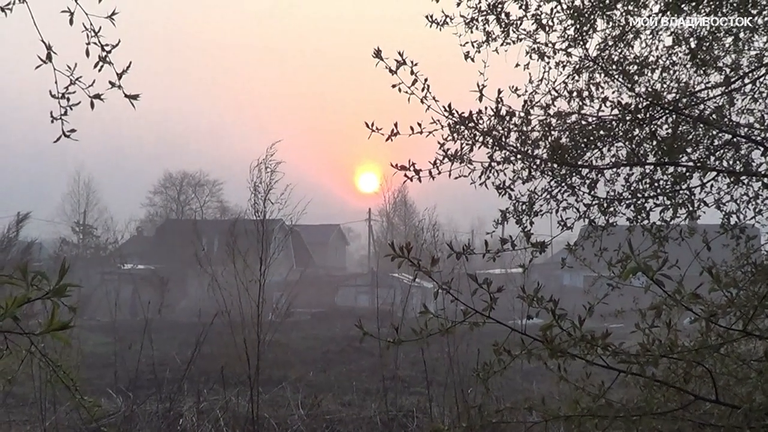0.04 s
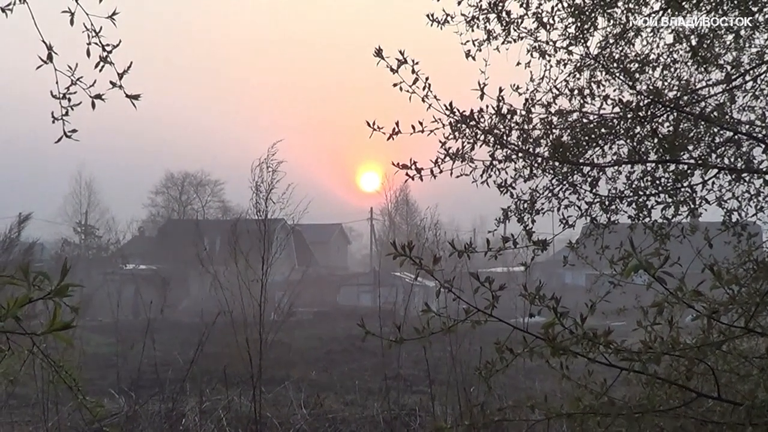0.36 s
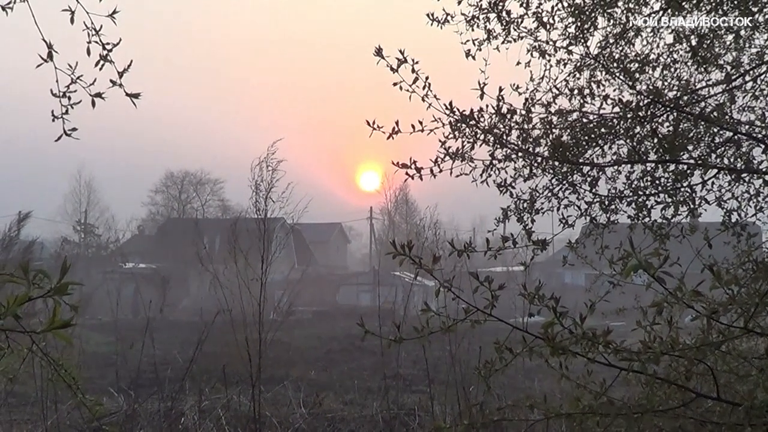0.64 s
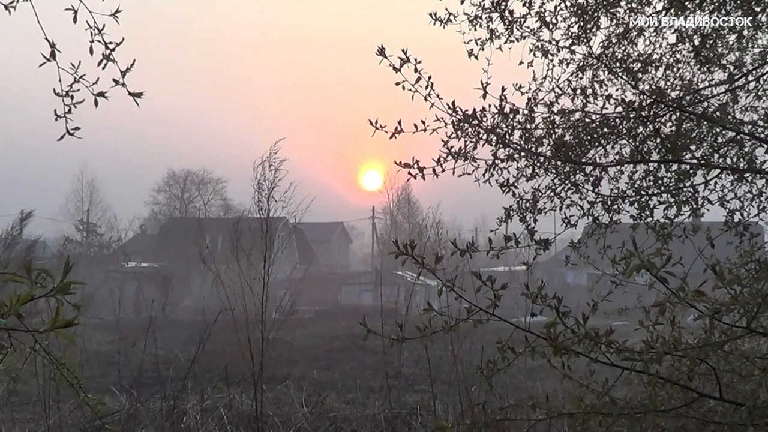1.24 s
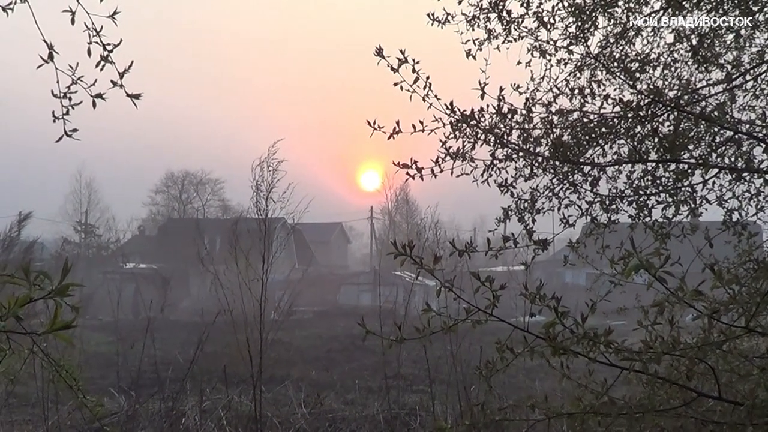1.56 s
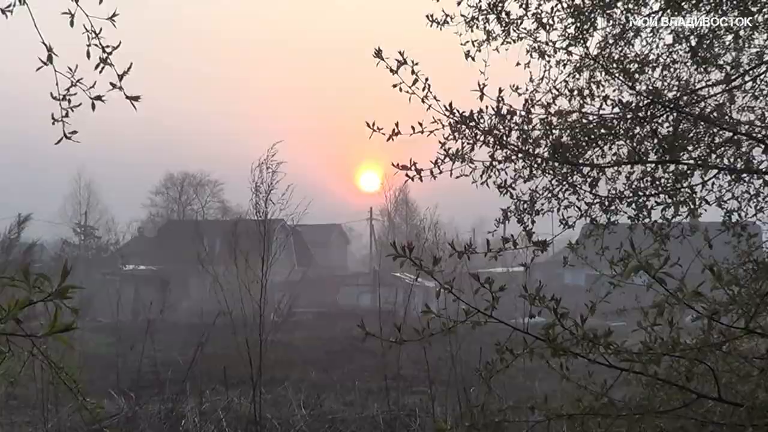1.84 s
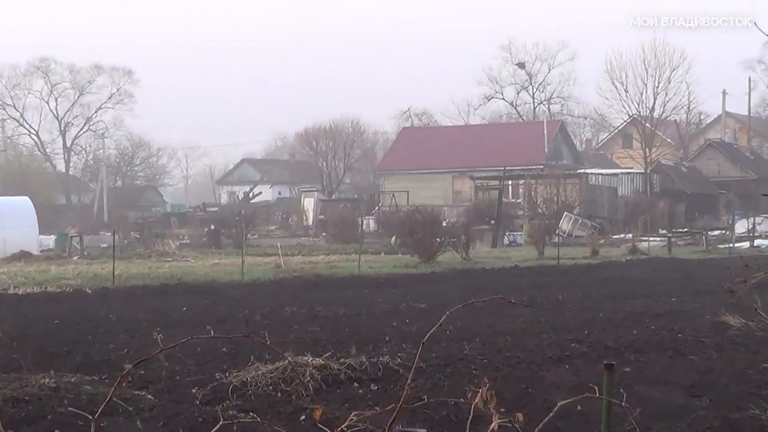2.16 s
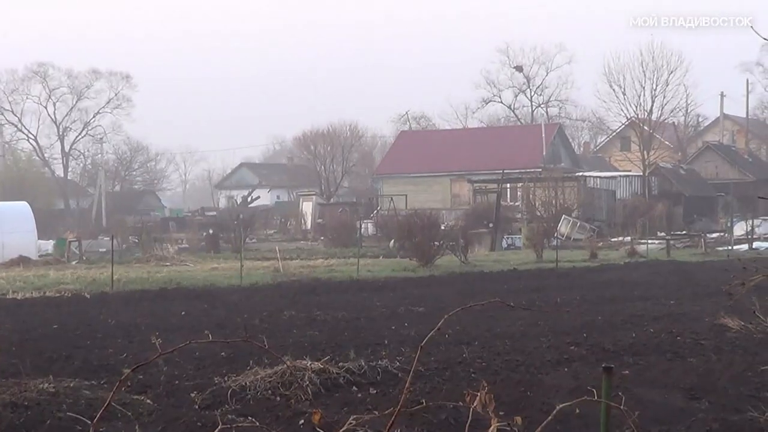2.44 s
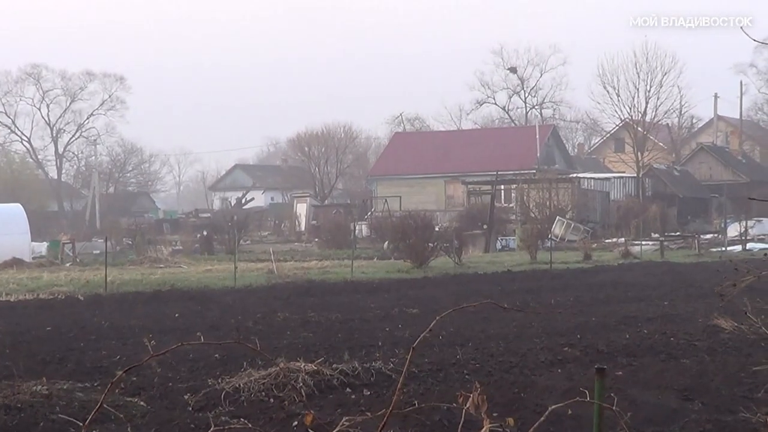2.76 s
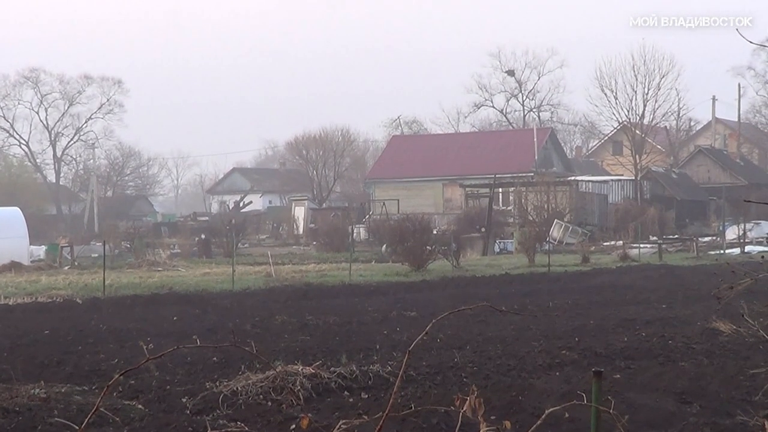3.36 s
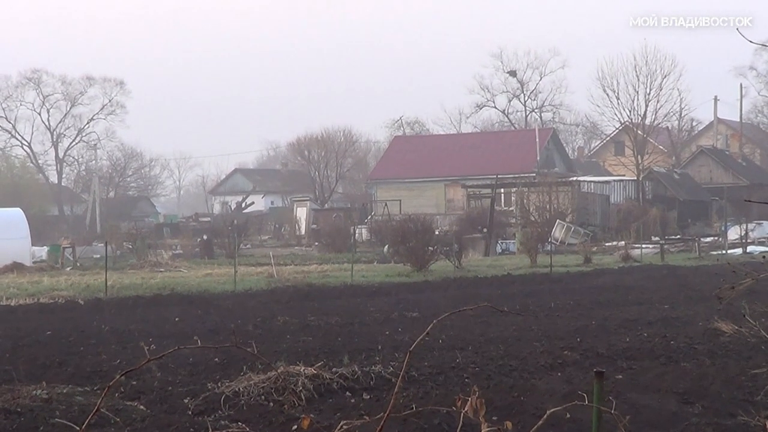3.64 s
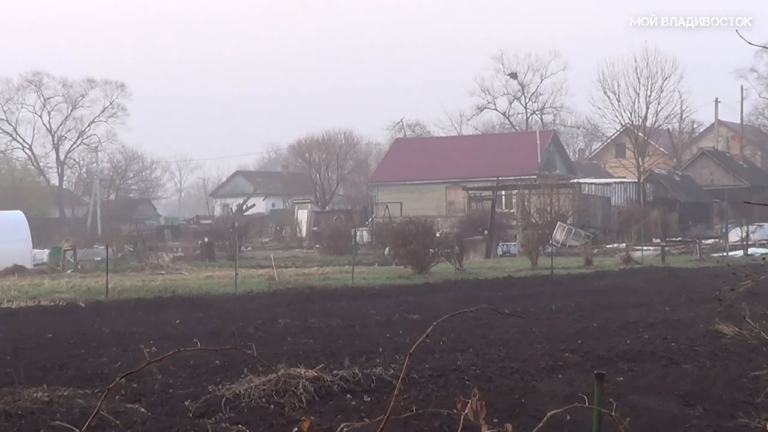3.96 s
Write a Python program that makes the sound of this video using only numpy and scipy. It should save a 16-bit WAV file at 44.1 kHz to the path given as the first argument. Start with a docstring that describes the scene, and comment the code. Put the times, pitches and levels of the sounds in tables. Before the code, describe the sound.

Sparrows chirp close to the microphone and farther out while a songbird whistles thinly and a dove coos faintly. The steady outdoor hiss cuts out for an instant halfway, then a distant rooster crows hoarsely across the village yards.

```python
"""A rooster crows far off to the right, hoarse at first and then on a held note, in a misty village morning.
Sparrows chirp near the microphone and farther out, a songbird whistles, a thrush chucks twice, a dove coos.
Each voice is a gliding tone or a stack of harmonics; houses and trees throw everything back.
A few twigs tick over the still air and the camera's hiss, and the sound drops out briefly halfway."""
import sys
import numpy as np
from scipy import signal
from scipy.fft import rfft, irfft
from scipy.io import wavfile
from scipy.ndimage import uniform_filter1d

SR = 44100
rng = np.random.default_rng(int(sys.argv[2]) if len(sys.argv) > 2 else 0)


def digitize_waveform(pressure):
    """Quantize a signal to 16-bit integers and store it at the path in sys.argv[1].

    Rows of a 2-D input are taken as channels; values are limited to [-1, 1].
    """
    field = np.atleast_2d(pressure).T
    bounded = np.clip(field, -1, 1)
    quanta = np.round(bounded * 32767).astype(np.int16)
    wavfile.write(sys.argv[1], SR, quanta)


N = 176400
TIME = np.arange(N) / SR
ROOSTER_PAN_DB = -7.5  # left minus right, like every pan
CHIRP_EDGE_S, WHISTLE_EDGE_S, WHISTLE_ECHO_DB = 0.0032, 0.011, -12.5
DROP_FROM_S, DROP_TO_S = 1.941, 1.9735
# still air and hiss at the microphone (frequency [Hz], relative level [dB])
AIR_SPECTRUM = [(18, -48), (30, -29), (64, -8.5), (132, -9), (216, -3), (437, 1.5), (1410, -5), (1520, -3),
                (1780, -4), (3320, -2.5), (4650, -5), (5440, -6), (8040, -13), (12200, -16.5), (13500, -15),
                (15000, -18)]


def amp(db):
    """Decibels to gain."""
    return 10 ** (np.asarray(db) / 20)


def unit(x):
    """Scales to rms 1."""
    return x / np.sqrt(np.mean(x ** 2) + 1e-20)


def read(points, hz):
    """Reads a curve on a log-frequency axis."""
    f, value = np.transpose(points)
    return np.interp(np.log(hz + 1), np.log(f + 1), value)


def add(mix, s, sound, pan_db=0):
    """Places a sound at a time and a left-right balance."""
    at = round(s * SR)
    sound = sound[max(-at, 0):]
    part = mix[:, max(at, 0):][:, :len(sound)]
    part += amp([[pan_db / 2], [-pan_db / 2]]) * sound[:part.shape[1]]


def wander(t, rate_hz):
    """Smooth random motion of rms 1."""
    count = len(t) + SR // 10
    hz = np.fft.rfftfreq(count, 1 / SR)
    return unit(irfft(rfft(rng.standard_normal(count)) * np.exp(-(hz / rate_hz) ** 2)))[:len(t)]


def voice(hz, count=1):
    """Equal harmonics in random phase on a pitch curve."""
    phase = 2 * np.pi * np.cumsum(hz) / SR
    return np.sqrt(2) * sum(np.sin(k * phase + 2 * np.pi * rng.random()) for k in range(1, count + 1))


def throat(x, colour):
    """Colours a sound with a fixed spectrum; rms 1."""
    hz = np.fft.rfftfreq(len(x), 1 / SR)
    return unit(irfft(rfft(x) * amp(read(colour, hz)), len(x)))


def swell(t, edge_s):
    """Soft attack, hold, soft release."""
    return np.sin(np.pi / 2 * np.clip(np.minimum(t, t[-1] - t) / edge_s, 0, 1))


def fading(t):
    """A call's level flickers by about 3 dB on its way to the microphone."""
    return amp(3 * wander(t, 67))


def clear_crow():
    """The rooster's held note: three harmonics, the second the strongest."""
    # clear voice (time [s], pitch [Hz], second harmonic [dB], third harmonic [dB])
    crow = [(3.122, 860, -70, -80), (3.2, 883.5, -53.5, -74), (3.3, 885, -73, -80), (3.475, 890, -65, -69),
            (3.498, 899, -41, -66), (3.535, 905, -43.5, -66), (3.566, 887, -54, -59),
            (3.645, 874, -67, -71), (3.685, 870, -43, -71), (3.728, 866.3, -42.5, -72),
            (3.755, 865, -46.5, -55), (3.794, 864, -48.5, -58), (3.83, 864.6, -40.5, -57),
            (3.856, 870, -53, -57), (3.878, 857.7, -45.5, -72), (3.93, 857.5, -48, -55),
            (3.97, 859.6, -50.5, -67), (3.99, 870, -41.5, -63)]
    out = np.zeros((2, N))
    s, hz, second_db, third_db = np.transpose(crow)
    pitch = np.interp(TIME, s, hz) * (1 + 0.0043 * wander(TIME, 124))
    for k, db in enumerate([second_db - 20, second_db, third_db], 1):
        add(out, 0, amp(np.interp(TIME, s, db, left=-120)) * voice(k * pitch), ROOSTER_PAN_DB)
    return out


def hoarse_crow():
    """The rooster's rasp: two fluttering oscillators, one pitched a little under the other."""
    # hoarse voice (time [s], upper pitch [Hz], upper level [dB], lower level [dB])
    rasp = [(3.08, 789, -68, -85), (3.191, 789, -56, -73), (3.24, 784.4, -50.5, -56),
            (3.39, 771.6, -53.5, -57), (3.46, 772.3, -51, -56), (3.56, 773.6, -49, -54.5),
            (3.65, 770.7, -54, -54.5), (3.701, 772, -47.5, -72), (3.78, 807, -63, -60),
            (4.0, 800, -59, -62.5)]
    # throat colour of each oscillator (frequency [Hz], relative gain [dB])
    upper_throat = [(350, -19), (600, -15), (730, -8), (980, -12), (1300, -3.5), (1600, 7), (2050, 0.5),
                    (2450, -13.5), (3100, -10), (5500, -18)]
    lower_throat = [(450, -23), (700, -6), (1000, 3.5), (1380, -6), (2090, -5), (2600, -22), (4000, -28)]
    flutter_hz, lower_ratio = 190.4, .905
    out = np.zeros((2, N))
    s, hz, upper_db, lower_db = np.transpose(rasp)
    pitch = np.interp(TIME, s, hz)
    upper = voice(pitch * (1 + 0.02285 * wander(TIME, 189.5)), count=6)
    flutter = voice(flutter_hz * (1 + 0.203 * wander(TIME, 81.4)))
    upper *= 1 + 0.95 * flutter + .5 * wander(TIME, 220)
    lower = voice(pitch * lower_ratio * (1 + .035 * wander(TIME, 105.8)), count=4)
    lower *= 1 + 1.4 * wander(TIME, 145)
    for tone, colour, db in (upper, upper_throat, upper_db), (lower, lower_throat, lower_db):
        add(out, 0, amp(np.interp(TIME, s, db, left=-120)) * throat(tone, colour), ROOSTER_PAN_DB)
    return out


def short_crows():
    """Short crows: the rooster's brief first note and other roosters farther off, each a wavering tone and its
    octave."""
    # short calls (time [s], length [s], pitch [Hz], fundamental [dB], octave [dB])
    calls = [(1.66, 0.284, 795, -69, -71.5), (2.824, .175, 804, -83, -59.5),
             (2.936, 0.13, 1061, -69.5, -66), (3.39, 0.096, 1052, -69.5, -56), (3.619, .2, 619, -74, -58)]
    out = np.zeros((2, N))
    for s, length, pitch, low_db, octave_db in calls:
        t = np.arange(0, length, 1 / SR)
        hz = pitch * (1 + 0.018 * wander(t, 148))
        envelope = swell(t, edge_s=0.045) * fading(t)
        tone = amp(low_db) * voice(hz) + amp(octave_db) * voice(2 * hz)
        add(out, s, envelope * tone, ROOSTER_PAN_DB)
    return out


def roosters():
    """All the crowing, heard across the yards; the rasp arrives mostly as echo."""
    clear, hoarse, far = clear_crow(), hoarse_crow(), short_crows()
    return yard(clear + far, echo_db=-6) + yard(hoarse, echo_db=1.83, direct_db=-1.5)


def sparrows():
    """Chirps near the microphone: one warbling tone bent through three pitches."""
    # chirps (time [s], length [s], start [Hz], middle [Hz], end [Hz], warble [Hz], level [dB], pan [dB])
    chirps = [(0.004, 0.043, 2543, 2220, 2070, 100, -50.5, 0),
              (0.13, .072, 3600, 3807, 3190, 200, -52, -1.5), (0.156, 0.028, 4520, 4750, 4040, 98, -53, -3),
              (0.441, 0.01, 5460, 5760, 5500, 100, -50.5, 3),
              (0.925, 0.021, 4490, 5130, 4560, 80, -50.5, -1),
              (1.002, 0.021, 4600, 4190, 3500, 100, -57, -5),
              (1.726, 0.046, 7950, 8770, 8730, 78, -64.5, 13),
              (1.761, 0.062, 8390, 8050, 8100, 400, -54.5, 5),
              (1.9, 0.032, 7550, 6440, 4000, 78, -56, 11.5), (2.062, 0.03, 3670, 3340, 3670, 197, -54, -5),
              (2.371, 0.029, 3510, 4520, 3620, 100, -50, -10),
              (2.81, 0.02, 4910, 5180, 4600, 60, -48.5, -7),
              (2.823, .046, 4305, 3530, 3180, 306, -50.5, -8), (3.002, 0.035, 1780, 1842, 2020, 46, -55, 5),
              (3.015, 0.046, 3100, 3660, 3110, 200, -51, -4), (3.219, 0.038, 1895, 3260, 2600, 40, -60, 4),
              (3.286, 0.035, 3426, 3810, 3990, 153, -54, 3), (3.938, .013, 4360, 5280, 6900, 84, -58.5, 13)]
    warble_rate_hz, jitter_hz = 47.5, 143
    out = np.zeros((2, N))
    for s, length, first, middle, last, warble, db, pan in chirps:
        t = np.arange(0, length, 1 / SR)
        bend = np.polyfit([0, .5, 1], [first, middle, last], 2)
        hz = np.polyval(bend, t / length) - warble * np.sin(2 * np.pi * warble_rate_hz * t)
        envelope = amp(db) * swell(t, CHIRP_EDGE_S) * fading(t)
        add(out, s, envelope * voice(hz + jitter_hz * wander(t, 486)), pan)
    return yard(out, echo_db=-5, direct_db=-3)


def chips():
    """Sharp chips to the right: a high tone shaken so fast that it spreads into a bright tick."""
    # chips (time [s], length [s], pitch [Hz], level [dB])
    calls = [(0.89, .016, 6600, -51.5), (.994, .016, 6470, -46), (1.086, .014, 7000, -61),
             (1.124, .012, 6500, -62)]
    spread_hz = 400
    out = np.zeros((2, N))
    for s, length, pitch, db in calls:
        t = np.arange(0, length, 1 / SR)
        hz = pitch + spread_hz * wander(t, 800)
        add(out, s, amp(db) * swell(t, length / 2) * voice(hz), pan_db=-4.5)
    return yard(out, echo_db=-8)


def thrush():
    """Harsh chucks just left of centre: a harmonic stack falls through a fixed throat."""
    # chucks (time [s], length [s], level [dB])
    chucks = [(0.449, .032, -44.5), (0.549, .039, -43.5)]
    # throat colour (frequency [Hz], relative gain [dB])
    colour = [(800, -69), (1450, -8.5), (1950, -12.5), (2450, -1), (3000, -13), (3700, -18), (4600, -10),
              (5300, -20), (8000, -25)]
    from_hz, to_hz = 720, 430
    out = np.zeros((2, N))
    for s, length, db in chucks:
        t = np.arange(0, length, 1 / SR)
        hz = (from_hz + (to_hz - from_hz) * t / length) * (1 + 0.035 * wander(t, 540))
        add(out, s, amp(db) * swell(t, length / 2) * throat(voice(hz, count=12), colour), pan_db=3)
    return yard(out, echo_db=-4)


def songbird():
    """Pure, distant whistles: high notes that droop at the end, and lower slurs that fall and settle."""
    # high notes (time [s], length [s], level [dB])
    whistles = [(0.368, 0.094, -63), (0.587, 0.11, -63), (0.824, 0.13, -60.5), (1.068, 0.11, -61),
                (1.343, 0.103, -60)]
    # slurs (time [s], length [s], start pitch [Hz], settling pitch [Hz], start level [dB])
    slurs = [(.79, .05, 2400, 1960, -65), (.868, .06, 4050, 3170, -62), (0.904, 0.096, 2950, 2480, -67),
             (1.062, 0.07, 2565, 1990, -60.5), (1.127, 0.063, 2500, 1940, -63),
             (1.187, 0.068, 2150, 1650, -61), (1.265, .035, 3700, 2800, -62.5),
             (1.335, .07, 3050, 2370, -65), (1.4, 0.14, 3750, 2650, -57), (1.722, 0.13, 2450, 2090, -61.5),
             (1.869, 0.061, 2040, 1640, -66)]
    whistle_hz, lead_hz, droop_hz = 4700, 338, 460
    lead_settle_s, slur_settle_s = 0.0088, .027
    out = np.zeros((2, N))
    for s, length, db in whistles:
        t = np.arange(0, length, 1 / SR)
        hz = whistle_hz + lead_hz * np.exp(-t / lead_settle_s) - droop_hz * (t / length) ** 11
        envelope = amp(db) * swell(t, WHISTLE_EDGE_S) * np.sqrt(fading(t))
        add(out, s, envelope * voice(hz + 15 * wander(t, 220)))
    for s, length, first, last, db in slurs:
        t = np.arange(0, length, 1 / SR)
        hz = last + (first - last) * np.exp(-t / slur_settle_s)
        envelope = amp(db - 4 * t / length) * swell(t, WHISTLE_EDGE_S) * fading(t)
        add(out, s, envelope * voice(hz + 30 * wander(t, 300)))
    return yard(out, WHISTLE_ECHO_DB)


def dove():
    """Soft, pure coos that sag at the end."""
    # coos (time [s], length [s], pitch [Hz], level [dB])
    coos = [(-.03, .18, 379, -54.5), (2.133, .24, 391, -67)]
    droop_hz = 23
    out = np.zeros((2, N))
    for s, length, pitch, db in coos:
        t = np.arange(0, length, 1 / SR)
        add(out, s, amp(db) * swell(t, edge_s=0.06) * voice(pitch - droop_hz * (t / length) ** 8))
    return yard(out, echo_db=-10.5)


def hoot():
    """A soft, far call that rises and falls in one arch."""
    # call (time [s], length [s], pitch at the ends [Hz], rise [Hz], level [dB])
    call = (3.83, 0.06, 640, 200, -56)
    s, length, pitch, rise, db = call
    out, t = np.zeros((2, N)), np.arange(0, length, 1 / SR)
    add(out, s, amp(db) * swell(t, WHISTLE_EDGE_S) * voice(pitch + rise * np.sin(np.pi * t / length)))
    return yard(out, WHISTLE_ECHO_DB)


def twigs():
    """Dry ticks that ring a few short modes."""
    # ticks (time [s], peak [dB])
    ticks = [(.055, -26.5), (1.021, -42.5), (1.046, -42.5), (1.29, -46), (1.645, -37), (1.874, -34.5)]
    # twig modes (frequency [Hz], relative level [dB], t60 [s])
    modes = [(1070, -0.5, 0.028), (1170, 6.5, 0.0063), (1900, -3.5, 0.034), (3040, 5.5, 0.0038),
             (4200, 2, 0.0029), (5640, -9, 0.0029)]
    out, t = np.zeros((2, N)), np.arange(SR // 20) / SR
    ring = sum(amp(db - 60 * t / t60) * np.sin(2 * np.pi * hz * t) for hz, db, t60 in modes)
    ring = signal.sosfilt(signal.butter(2, 830, "highpass", fs=SR, output="sos"), ring)
    for s, db in ticks:
        add(out, s, amp(db) * ring / abs(ring).max())
    return yard(out, echo_db=-7.5)


def far_sparrows():
    """Far chirps smeared by echoes, over a random chorus still farther off."""
    # chirps (time [s], length [s], pitch [Hz], level [dB])
    chirps = [(0, 0.05, 3970, -52), (0.043, 0.093, 4600, -57.5), (0.045, 0.061, 6900, -59.5),
              (0.216, 0.021, 5480, -54.5), (0.267, 0.037, 4740, -57), (0.351, 0.027, 5600, -55),
              (0.36, 0.018, 3700, -55.5), (0.635, 0.022, 5780, -55), (0.641, 0.074, 3680, -57),
              (0.865, 0.049, 3630, -56), (0.963, 0.027, 3600, -59), (1.238, 0.036, 3990, -57.5),
              (1.57, 0.02, 4190, -56), (1.617, 0.014, 4800, -55), (1.194, 0.022, 4460, -60),
              (1.776, 0.063, 4450, -56.5), (2.07, 0.025, 5010, -56), (2.144, 0.029, 4700, -58),
              (2.231, .04, 4510, -54), (2.295, 0.045, 4450, -54.5), (2.793, 0.036, 5020, -58),
              (2.853, 0.03, 3520, -53.5), (2.469, 0.036, 4130, -58), (2.509, 0.078, 2240, -62.5),
              (2.614, 0.029, 2490, -54.5), (2.678, .045, 7700, -62), (2.88, 0.02, 4900, -54.5),
              (3.278, 0.056, 7280, -62), (3.332, 0.028, 4400, -55), (3.393, 0.068, 7000, -64),
              (3.521, 0.022, 4090, -57), (3.771, 0.051, 3340, -55), (3.974, .025, 4270, -58)]
    chorus_per_s, chorus_hz, chorus_db, note_s = 8.7, 4145, -69, 0.063
    warble_rate_hz = 37.83
    out = np.zeros((2, N))
    draws = rng.random((round(chorus_per_s * N / SR), 3))
    chorus = [(when * N / SR, note_s * (.5 + span), chorus_hz * (.8 + .4 * height), chorus_db)
              for when, span, height in draws]
    for s, length, pitch, db in chirps + chorus:
        t = np.arange(0, length, 1 / SR)
        jitter = 0.0899 * min(pitch, chorus_hz) * wander(t, 610)
        depth_hz = 653 * min(pitch / chorus_hz, chorus_hz / pitch) ** 2
        warble = depth_hz * np.sin(2 * np.pi * (warble_rate_hz * t + rng.random()))
        add(out, s, amp(db) * swell(t, CHIRP_EDGE_S) * voice(pitch + jitter + warble))
    return yard(out, echo_db=-2.5, direct_db=-2.5)


def yard(x, echo_db, direct_db=0):
    """The direct path to the microphone plus scattered echoes from houses and trees."""
    # echo decay (frequency [Hz], t60 [s])
    decay = [(400, 0.38), (1700, 0.39), (4000, 0.2), (8000, 0.24)]
    likeness = 0.47  # between left and right
    taps = rng.standard_normal((2, SR)) * (rng.random((2, SR)) < .1)
    taps[1] = likeness * taps[0] + np.sqrt(1 - likeness ** 2) * taps[1]
    hz, t, bands = signal.stft(taps, SR, nperseg=256)
    t60 = read(decay, hz)[:, None]
    tail = signal.istft(bands * amp(-60 * t / t60) / np.sqrt(t60), SR, nperseg=256)[1]
    echo = signal.fftconvolve(x, tail / np.linalg.norm(tail[0]), axes=1)[:, :N]
    return amp(direct_db) * x + amp(echo_db) * echo


def air():
    """Distant wash with slight drifting patches; its treble is the camera's mono hiss."""
    # stereo image (frequency [Hz], left-right likeness [0-1])
    image = [(60, 0.95), (250, 0.92), (600, 0.45), (1500, 0), (4000, 0.69), (7000, 0.62), (9500, 1)]
    hz = np.fft.rfftfreq(2048, 1 / SR)
    left_re, left_im, side_re, side_im, patches = rng.standard_normal((N // 512 + 5, 1025, 5)).T
    patches = unit(uniform_filter1d(uniform_filter1d(patches, size=20, axis=0), size=5, axis=1))
    likeness = read(image, hz)[:, None]
    width = np.sqrt(1 - likeness ** 2)
    left = left_re + 1j * left_im
    right = likeness * left + width * (side_re + 1j * side_im)
    bands = np.array([left, right]) * amp(read(AIR_SPECTRUM, hz)[:, None] + 2 * patches * width)
    level_db = np.where(TIME < DROP_TO_S, -54.5, -55)
    return amp(level_db) * unit(signal.istft(bands, nperseg=2048, noverlap=1536)[1][:, :N])


def scene():
    """Birds and twigs around the microphone, over the morning air."""
    return (air() + sparrows() + chips() + songbird() + thrush() + roosters()
            + hoot() + dove() + twigs() + far_sparrows())


def record(dry):
    """Adds the camera's whine, drops out briefly, returns with a faint click, and limits the band."""
    # whine, whose close tones beat into a flutter (frequency [Hz], level [dB])
    whine_tones = [(15625, -68), (15575, -78), (15675, -82), (15525, -84), (15725, -85), (11725, -82)]
    fade_s, return_s, click_s, click_decay_s, top_hz = 0.0022, 0.031, 1.9808, 0.0017, 15850
    whine = sum(amp(db) * voice(np.full(N, hz)) for hz, db in whine_tones)
    fade_out = np.exp(-np.maximum(TIME - DROP_FROM_S, 0) / fade_s)
    fade_in = np.clip((TIME - DROP_TO_S) / return_s, 0, 1) ** 2
    out = (dry + whine) * (fade_out + fade_in)
    t = np.arange(SR // 20) / SR
    click = np.exp(-t / click_decay_s) * throat(rng.standard_normal(len(t)), AIR_SPECTRUM)
    add(out, click_s, amp(-50.5) * click, pan_db=-4)
    low_pass = signal.firwin(1023, top_hz, window=("kaiser", 9), fs=SR)
    return signal.oaconvolve(out, low_pass[None], "same")


dry = scene()
out = record(dry)
digitize_waveform(out)
```